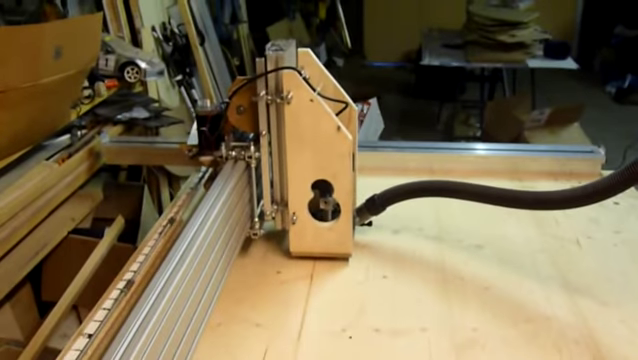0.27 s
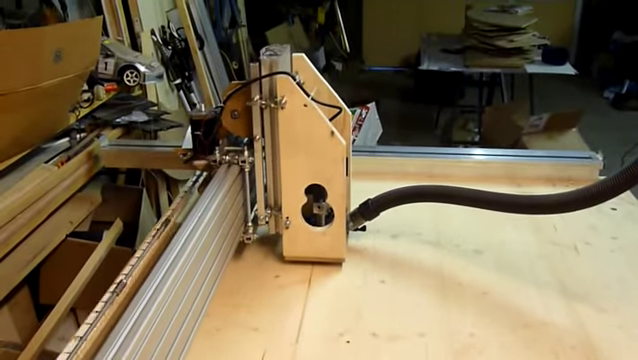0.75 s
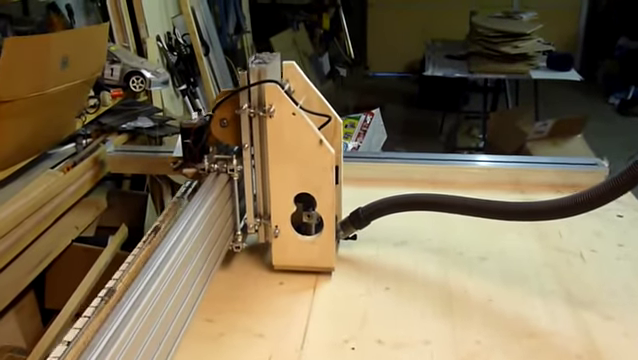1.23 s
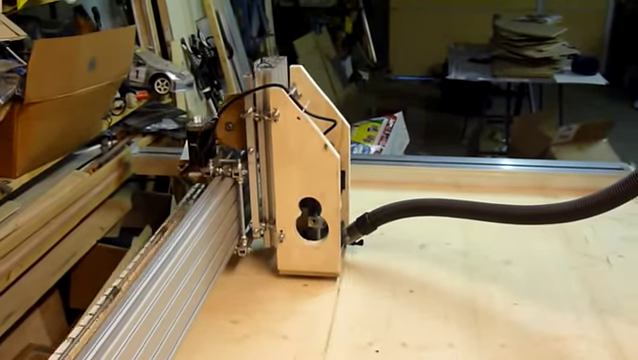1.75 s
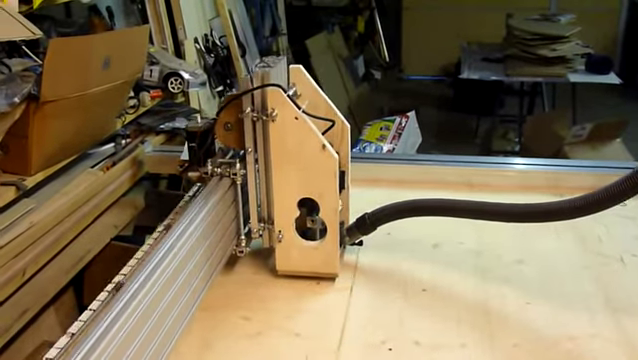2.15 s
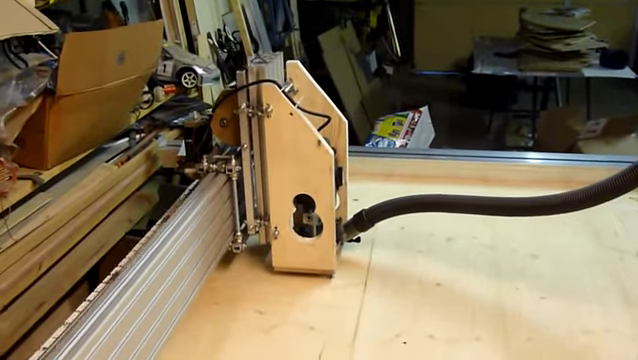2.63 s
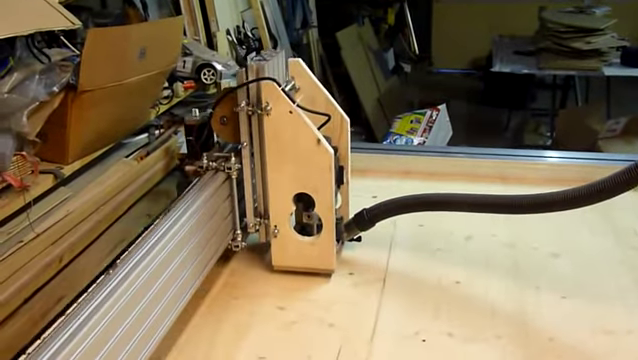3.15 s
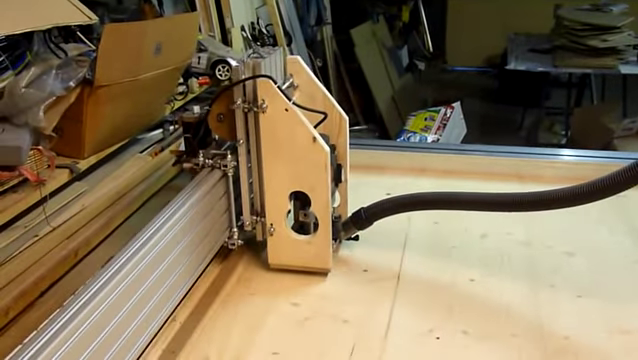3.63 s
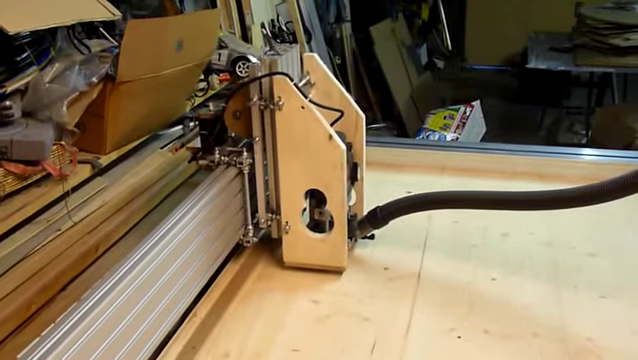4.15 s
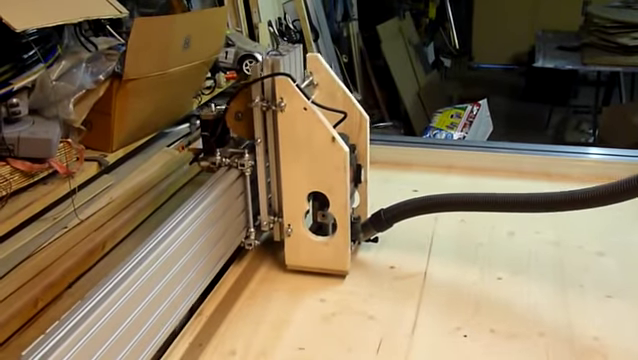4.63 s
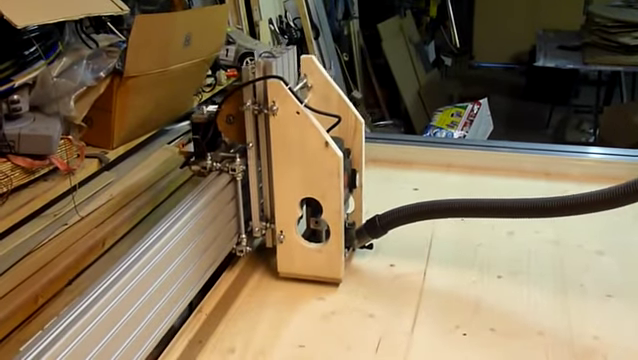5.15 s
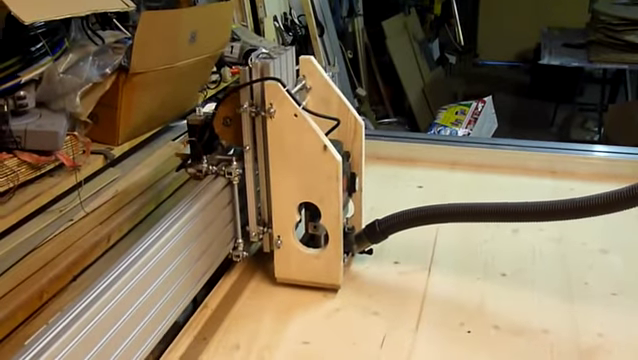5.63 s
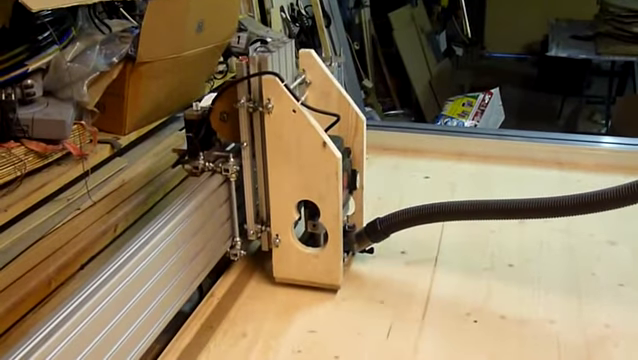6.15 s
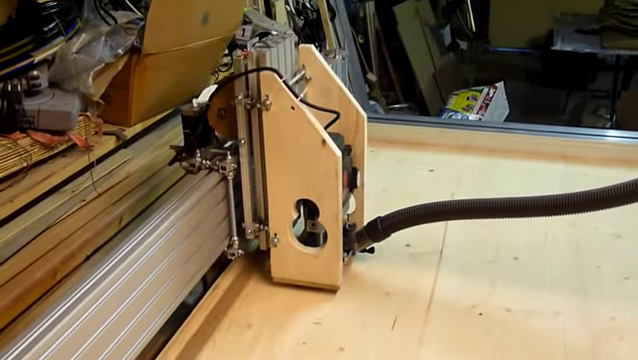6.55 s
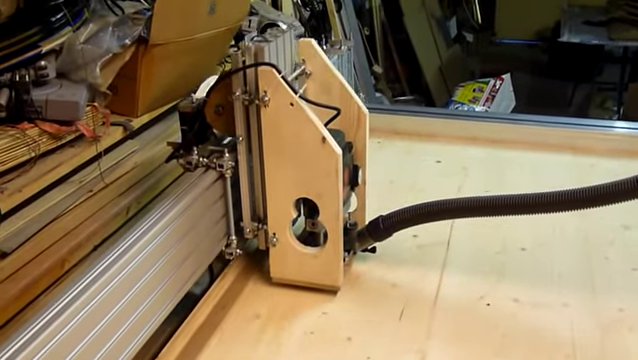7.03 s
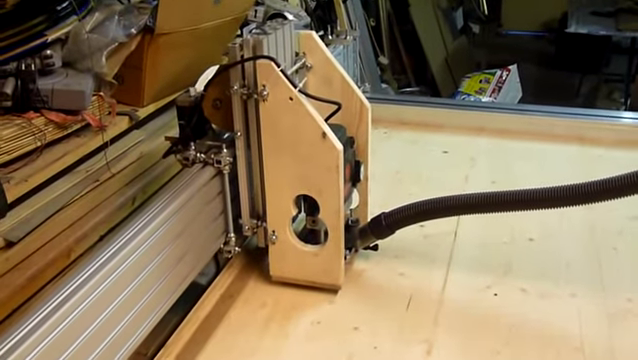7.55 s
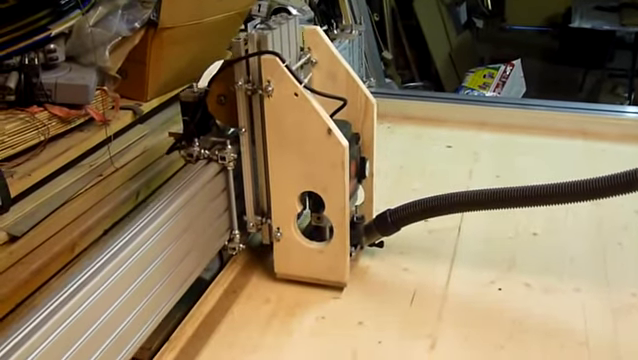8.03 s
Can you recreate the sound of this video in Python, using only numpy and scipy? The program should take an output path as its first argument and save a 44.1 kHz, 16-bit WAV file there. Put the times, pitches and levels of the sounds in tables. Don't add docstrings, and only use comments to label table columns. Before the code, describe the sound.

A router gantry runs empty, its motors whining up, holding a hollow tone, then a brighter buzz, and sliding down amid knocks and clicks.

```python
import sys
import numpy as np
from scipy import signal
from scipy.fft import rfft, irfft, next_fast_len
from scipy.io import wavfile
from scipy.ndimage import uniform_filter1d, map_coordinates

SR = 44100
rng = np.random.default_rng(int(sys.argv[2]) if len(sys.argv) > 2 else 0)


def gain_from_decibels(decibels):
    exponent = np.asarray(decibels, float) / 20
    return 10 ** exponent


def bounce(signal):
    frames = np.transpose(np.atleast_2d(signal))
    limited = np.clip(frames, -1, 1)
    pcm = np.round(limited * 32767).astype(np.int16)
    wavfile.write(sys.argv[1], SR, pcm)


N = 365148

# step_rate_multiple, level_db
LONG_ORDERS = [(.757, -5), (1.76, -12), (2, -4), (3, 3), (4, -10)]
CROSS_ORDERS = [(.5, -16), (1.5, -7), (2, 8), (3, -3.5), (4, -1.5), (5, -5.5), (5.5, -11), (6, -7),
                (8, -10), (9, -6), (10, -7), (11, -10), (14, -10), (15, -9)]
ARRIVE_WHINE = [(16, -8), (20.5, 7), (25, 10), (34, 4)]
LONG_WHINE = [(15.8, -2.5), (34, -13), (66, -19)]
DEPART_WHINE = [(21, -6), (32, -9), (40, -11), (63, -11)]
# step_rate_multiple, level_db
BELT_ORDERS = [(2.94, 0), (5.88, -4.5), (8.82, -8), (11.76, -15), (31.5, -17), (63, -21)]
NEARING_DB = {1.5: 3, 4: 10, 5: 3, 9: 8}

# start_s, full_speed_s, brake_s, stop_s, period_change_ms_per_s
ARRIVE_MOVE = (-1, .048, .048, .56, 27.3)
LONG_MOVE = (.58, .971, 3.672, 4.16, 26.1)
CROSS_MOVE = (4.11, 4.593, 7.403, 7.93, 23.8)
DEPART_MOVE = (7.83, 8.332, 9, 9.5, 23.5)
# time_s, step_rate_hz, step_tone_db, overtones_db
LONG_LOAD = [(0.99, 353.8, -14.5, -51.5), (1.579, 351.7, -14, -54.5), (1.72, 355.3, -15, -47),
             (2.25, 354.3, -15, -54), (2.67, 356.5, -18, -43.5), (2.74, 359, -20, -51),
             (3.459, 353.9, -20.5, -51), (3.66, 356.1, -22, -48.5)]
CROSS_LOAD = [(4.66, 375.7, -31.5, -38.5), (4.74, 378.9, -30, -34.5), (5.37, 375.4, -28, -35.5),
              (5.53, 375.7, -29.5, -39), (5.57, 378, -27.5, -33.5), (5.83, 375.3, -26, -33.5),
              (6.04, 376.4, -28, -38), (6.15, 377.5, -25.5, -33.5), (7.39, 377.1, -26.5, -34.5)]
# overtone_offset_db, whine_or_belt_db, swing_with_overtones (db per db)
LONG_HELD = (5.7, -81.5, .3)
CROSS_HELD = (-7, -40.5, 1.46)
# step_rate_hz, step_tone_db, overtones_db, whine_or_belt_db
ARRIVE_SWEEP = [(63, -73, -45, -57), (76, -65, -55.5, -62), (91, -65, -59, -63), (103, -47, -49, -70),
                (178, -36, -70, -74), (197, -30.5, -44, -71), (290, -38, -50, -72), (350, -26, -46.5, -77)]
LONG_RISE = [(74, -80, -72, -46), (100, -64, -67, -39), (121, -38, -52, -56), (156, -42, -66, -69),
             (201, -30, -63, -72), (270, -37.5, -51, -76), (320, -30.5, -44, -74.5), (342, -31.5, -47, -79),
             (354, -17.5, -48, -77)]
LONG_FALL = [(64.3, -78, -44, -39), (84, -71, -62, -45), (100, -51, -64, -38.5), (124, -47, -59, -53),
             (170, -42, -67, -67.5), (205, -31, -62, -71), (250, -29, -39, -68), (294, -20.5, -54, -76),
             (352.5, -24.5, -37, -81)]
CROSS_RISE = [(65, -78, -71, -41), (78, -67, -81, -43), (101, -65, -62, -39), (135, -51, -55, -40),
              (173, -55, -54, -40.5), (215, -48, -62, -37.5), (240, -30, -58, -41), (268, -24, -65, -31.5),
              (307, -35, -61, -29), (300, -15.5, -64, -40.5), (323, -15.5, -60, -42.5),
              (350, -32, -48, -37), (378, -34, -30, -43)]
CROSS_FALL = [(64.5, -78, -71, -44), (75, -70, -83, -41), (80.5, -63, -79, -43), (99, -61, -77, -45),
              (119, -59, -59, -44.5), (140, -51, -54, -40), (170, -50, -53.5, -42), (215, -48, -78, -37),
              (246, -31, -60, -48), (300, -37, -53, -50), (323, -33, -62, -46.5), (353, -21, -49, -47.5),
              (390, -28, -34, -44)]
RETURN_SWEEP = [(70.6, -75, -56, -51), (88, -68, -52, -41.5), (113, -46, -57, -46), (131, -44, -63, -48),
                (153, -59, -67, -55.5), (180, -44, -66, -47.5), (237, -43.5, -45.5, -60)]

# frequency_hz, level_db
FRAME = [(40, -20), (150, -8), (220, 0), (900, 0), (1050, -7), (1900, -11), (3200, -19), (6000, -22),
         (10000, -34)]
# center_hz, width_hz, lift_db
FRAME_MODES = [(240, 40, 6), (345, 50, 4), (610, 70, 5), (870, 80, 6), (1570, 120, 3)]
# start_s, level_db, pitch_hz, t60_s
JOLTS = [(.0, -24.5, 250, 0.33), (.012, -26.5, 712, .19), (.385, -39.5, 350, 0.43), (.465, -48, 864, .1),
         (.49, -53, 2280, .15), (.498, -30, 205, 0.3), (.505, -41.5, 1056, 0.19), (.62, -40, 847, .12),
         (.93, -35.5, 505, .15), (.945, -40.5, 695, .12), (.97, -20, 300, 0.19), (3.688, -17, 290, 0.2),
         (3.87, -32, 256, .2), (3.93, -33.5, 240, 0.19), (4.04, -54, 1560, 0.36), (4.1, -61, 2260, .15),
         (4.13, -38.5, 860, 0.25), (4.14, -44, 690, 0.18), (4.552, -23, 886, 0.14),
         (4.575, -30, 1100, 0.16), (4.588, -19, 283, 0.14), (4.59, -24.5, 712, 0.092),
         (4.596, -29, 1410, 0.09), (4.618, -29.5, 748, 0.14), (4.624, -21.5, 305, 0.24),
         (4.625, -32, 1096, 0.13), (4.79, -36, 1034, 0.18), (5.538, -40, 1490, .08), (5.55, -43, 1370, .08),
         (5.535, -32, 300, 0.21), (5.534, -27, 487, 0.12), (6.815, -35, 505, 0.14), (7.407, -28, 936, .05),
         (7.412, -34.5, 1310, 0.18), (7.425, -22, 903, 0.13), (7.41, -9.5, 310.6, 0.21),
         (7.45, -33, 1020, 0.13), (7.46, -33, 895, 0.21), (7.476, -36, 278, 0.1), (7.48, -31, 590, .07),
         (7.492, -20.5, 237, 0.15), (7.518, -24.5, 584, 0.083), (7.543, -37, 467, 0.1),
         (7.765, -30, 242.6, 0.6), (7.855, -28, 221, .2), (8.218, -37.5, 451, 0.14),
         (8.219, -48, 1535, 0.11)]
# start_s, level_db, pitch_hz, t60_s
CROSSINGS = [(.27, -40, 192, 0.34), (.66, -38, 187.6, .3), (8.13, -36, 255, .2), (.72, -39, 506, 0.23),
             (3.92, -45, 1550, 0.23), (4.07, -46, 1114, 0.17), (4.26, -39, 852, 0.2), (4.41, -35, 850, .12),
             (7.66, -36.5, 610, 0.64), (7.78, -43, 480, .2), (7.96, -32, 320, 0.28),
             (8.214, -28.5, 178, 0.7), (8.208, -63.5, 8700, .1), (8.236, -64, 8700, .1),
             (8.257, -67, 8750, .08), (8.21, -60, 4100, .08)]

# time_s, level_db
SHAKE = [(0, -42), (.06, -47), (.34, -56), (.8, -55), (.94, -48), (1.04, -49), (2.07, -51), (3.09, -46),
         (3.74, -49), (3.88, -55), (4.49, -56), (4.59, -49), (4.72, -53), (7.36, -51), (7.45, -46),
         (7.53, -56), (8.12, -56), (8.28, -52)]
# level_db, growth (db per db of shake), long_cruise_db, cross_cruise_db
TABLE_BOOM = (-55.5, 1.5, -2.5, -3.5)
WOOD_RATTLE = (-43, 1.49, -4, -7)
RAIL_RATTLE = (-51, 1.48, 0.33, -1.2)
BEARING_HISS = (-59, 1.78, -3, 0.5)
# center_hz, width_hz, lift_db
BOOM_RATE = (165, 43, 9.2)
# frequency_hz, density_db_per_hz
BOOM_SPECTRUM = [(100, -62), (140, -18), (170, -4), (250, -0.5), (320, 6), (420, -18), (600, -52)]
WOOD_SPECTRUM = [(250, -67), (340, 5.5), (440, -2.5), (530, 2), (700, -0.5), (870, 0.5), (1050, -6.5),
                 (1500, -62.5)]
RAIL_SPECTRUM = [(800, -61.5), (1050, 0), (1300, 2.5), (1700, -0.5), (2200, -5), (2600, -6.5), (3400, -57)]
HISS_SPECTRUM = [(2000, -68), (2600, 7), (3400, 2), (4300, -3.5), (5700, -2.5), (7000, -4.5), (8500, -7.5),
                 (10000, -23.5), (10600, -56.5)]

# start_s, peak_db
TICKS = [(0.1778, -42.5), (0.3874, -50), (0.569, -43.5), (0.67, -43), (0.7652, -37.5), (0.867, -39.5),
         (1.02, -48.5), (1.0788, -45.5), (1.2525, -45), (1.269, -39.5), (1.4184, -43), (1.472, -52.5),
         (1.5637, -48.5), (1.6107, -46), (1.648, -47), (1.765, -41.5), (1.8404, -40.5), (1.8515, -41),
         (1.8899, -34), (2.0275, -50), (2.0862, -40), (2.11, -49.5), (2.134, -55.5), (2.1848, -34),
         (2.2643, -40.5), (2.3656, -32), (2.4625, -36.5), (2.563, -44.5), (2.684, -32), (2.752, -40),
         (2.828, -35.5), (2.9766, -43), (3.019, -31), (3.224, -44), (3.2823, -42), (3.334, -29.5),
         (3.5083, -38), (3.684, -43), (3.7896, -49), (4.547, -54.5), (5.419, -47.5), (7.2267, -53),
         (7.3247, -40.5), (8.2574, -51.5)]
# start_s, crack_db, knock_db
KNOCKED_TICKS = [(.2566, -46.5, -38.5), (.7234, -44.5, -44.5), (.9215, -46.5, -63), (.9643, -45, -43.5),
                 (1.1503, -40.5, -27), (1.9894, -50.5, -29), (2.6348, -41.5, -23.5), (3.6292, -53, -42),
                 (4.53, -63, -29.5), (4.556, -49, -28), (4.571, -40.5, -22.5), (4.582, -47, -32),
                 (4.594, -49.5, -24.5), (5.2855, -53, -23), (5.5333, -37, -25), (6.8151, -37.5, -29),
                 (7.008, -59, -39.5), (7.4117, -37, -20.5), (7.45, -56, -47), (8.218, -52, -38)]
# frequency_hz, density_db_per_hz
LINK_SPECTRUM = [(2000, -62.5), (2700, -2), (3600, -2), (4600, 1), (5600, 1), (6800, -1.5), (8500, -13),
                 (10000, -20), (10600, -62)]
KNOCK_SPECTRUM = [(350, -55.5), (500, -6.5), (900, 0), (1300, 0.5), (1900, -9.5), (2500, -11),
                  (3200, -61.5)]
# start_s, level_db, pitch_hz, t60_s
SNAP = (5.2886, -19.5, 1300, .022)

# pitch_hz, width_hz, level_db
PANELS = [
    (880, 40, -60),
    (1560, 24, -65.5),
]
# pitch_hz, width_hz, level_db
TABLE_HUM = (163, 11, -51)
# time_s, level_db
RUMBLE = [(0, -63), (.9, -64.5), (1.1, -60.5), (3.76, -64.5), (4.31, -72.5), (6.55, -69.5), (6.75, -63.5),
          (7.38, -60), (7.55, -69.5), (8.28, -61.5)]
# frequency_hz, density_db_per_hz
DEEP_SPECTRUM = [(20, -64.5), (32, -16.5), (48, 2.5), (65, 4), (90, -4.5), (120, -62.5)]
DRONE_SPECTRUM = [(80, -64), (100, -3.5), (117, -1.5), (135, -8.5), (170, -56.5)]

# frequency_hz, coherence (0 to 1)
ALIKE = [(30, .99), (60, .993), (200, .998), (600, .99), (1100, .93), (1800, .7), (2600, .3), (4500, .3),
         (10000, .1)]
# frequency_hz, left_minus_right_db
PORT_LEAN = [(100, -.1), (350, -.5), (1000, -.3), (1800, .5), (3500, 2), (6000, 2.5), (10000, .5)]
# center_hz, width_hz
NOTCHES = [(2600, 840), (4620, 680), (7900, 400)]


def unit(x):
    return x / np.sqrt(np.mean(x ** 2) + 1e-20)


def along(points, hz):
    f, v = np.transpose(points)
    return np.interp(np.log(hz + 1), np.log(f + 1), v)


def curves(rows):
    s, *columns = np.transpose(rows)
    return [np.interp(np.arange(N) / SR, s, column) for column in columns]


def wobble(rate):
    knots = rng.standard_normal(int(N * 100 / SR) + 4)
    return map_coordinates(knots, [np.arange(N) * min(rate, 100) / SR])


def filtered(x, response):
    m = next_fast_len(N + 8192)
    return irfft(rfft(x, m) * response(np.fft.rfftfreq(m, 1 / SR)), m)[..., :N]


def spread(pair, spectrum):
    def shares(hz):
        turn = np.arccos(np.clip(along(ALIKE, hz), -1, 1)) / 2
        return gain_from_decibels(along(spectrum, hz)) * [np.cos(turn), np.sin(turn)]

    mid, side = filtered(pair, shares)
    return unit(np.array([mid + side, mid - side]))


def lean(db):
    return gain_from_decibels([[db / 2], [-db / 2]])


def drive(move, load, held, rise, fall):
    start, full, brake, stop, pace = move
    start_fade_s, settle_s, release_s = .04, .008, .012
    t = np.arange(N) / SR
    top_hz, tone_db, strain_db = curves(load)
    top_hz = top_hz * (1 + .0018 * wobble(7))
    before_full = (full - t) * (start > 0)
    off_speed_s = np.maximum(0, np.maximum(before_full, t - brake))
    step_hz = 1 / (1 / top_hz + pace / 1000 * off_speed_s)

    lock_times = [full, full + settle_s, brake - release_s, brake]
    locked = (brake > full) * np.interp(t, lock_times, [0, 1, 1, 0])
    fine_db = held[1] + held[2] * (strain_db - strain_db.mean()) + wobble(6)
    steady = [tone_db, strain_db + held[0], fine_db]

    def swept(sweep, k):
        return along([(row[0], row[k + 1]) for row in sweep], step_hz)

    levels = []
    for k in range(3):
        gliding = np.where(t < full + settle_s, swept(rise, k), swept(fall, k))
        levels.append((1 - locked) * gliding + locked * steady[k])
    levels = uniform_filter1d(levels, size=SR // 200, axis=1)
    running = np.interp(t, [start, start + start_fade_s, stop - start_fade_s, stop], [0, 1, 1, 0])
    return step_hz, levels, running


def radiated(hz):
    lifts = sum(db / (1 + (2 * (hz - c) / w) ** 2) for c, w, db in FRAME_MODES)
    return along(FRAME, hz) - 3 + lifts


def motor(driven, orders, fine_orders, flutter_db, tone_db, brake_db, kick=0):
    step_hz, (step_db, over_db, fine_db), running = driven
    braking = np.gradient(step_hz) < -5e-4
    crawl_db = .25 * np.maximum(92 - step_hz, 0) * braking
    slow = np.clip((345 - step_hz) / 80, 0, 1)
    turn = 2 * np.pi * np.cumsum(step_hz * (1 + .005 * slow * wobble(75))) / SR
    tone_level_db = step_db + along(FRAME, step_hz) + (tone_db + 1.3 * slow) * wobble(40)
    out = np.ones((2, 1)) * gain_from_decibels(tone_level_db) * np.sin(turn + kick + .03 * wobble(50))
    travel = np.interp(np.arange(N) / SR, CROSS_MOVE[1:3], [-.3, .3])
    for family, family_db in (orders, over_db), (fine_orders, fine_db):
        for k, db in family:
            depth_db = flutter_db + 1.5 * slow if k < 12 else 2.5
            level_db = family_db + db + radiated(k * step_hz) + depth_db * wobble(38)
            if k > 30:
                level_db = level_db + brake_db * braking - crawl_db
            level = gain_from_decibels(level_db)
            if family is BELT_ORDERS and 5 < k < 12:
                level = level / (1 + (k * step_hz / 1150) ** 6)
            blur = .3 * wobble(22)
            blur = blur + (.6 + .9 * (k > 12) + 1.5 * (k > 30)) * slow * wobble(80)
            blur = blur + .8 * (k > 5) * (1 - slow) * wobble(60)
            drift = wobble(5)
            nearing_db = kick * NEARING_DB.get(k, 0) * travel * (1 - slow)
            level = level * gain_from_decibels(1.8 * (k > 3.5) * drift + nearing_db)
            apart = np.arccos(along(ALIKE, k * step_hz)) * drift / 3
            out = out + level * np.sin(k * turn + kick + blur + np.array([apart, -apart]))
    return np.sqrt(2) * running * out, running * np.sin(turn), running * step_hz


def backlash():
    out, t = np.zeros(N + SR), np.arange(SR // 2) / SR
    swell, bend = wobble(60), wobble(45)
    for k, (s, db, hz, t60) in enumerate(list(JOLTS) + list(CROSSINGS)):
        mine = slice(k * 5000, k * 5000 + len(t))
        build = 1 - np.exp(-t * hz / 2)
        fade = gain_from_decibels(db - 60 * t / t60 + 1.1 * swell[mine]) * build
        out[round(s * SR):][:len(t)] += fade * np.sin(2 * np.pi * hz * t + 1.33 * bend[mine])
    return filtered(out[:N], lambda f: 1 / (1 + (170 / (f + 1)) ** 6))


def patchy(x, db):
    z = signal.stft(x, nperseg=512)[2]
    field = rng.standard_normal(z.shape[1:])
    field = uniform_filter1d(field, size=3, axis=0)
    field = uniform_filter1d(field, size=5, axis=1)
    return unit(signal.istft(z * gain_from_decibels(db * unit(field)), nperseg=512)[1][:, :N])


def carriage(step, long_hz, cross_hz):
    shake_db, = curves(SHAKE)
    shake_db = shake_db - -52
    long_fast, cross_fast = [uniform_filter1d(1. * (hz > 345), SR // 10) for hz in (long_hz, cross_hz)]

    def part_db(part):
        db, grows, long_db, cross_db = part
        return db + grows * shake_db + long_db * long_fast + cross_db * cross_fast

    def shaken(depth):
        return rng.standard_normal((2, N)) * (1 + depth * step)

    center_hz, width_hz, lift_db = BOOM_RATE
    boom_db = part_db(TABLE_BOOM) + lift_db * np.exp(-((long_hz - center_hz) / width_hz) ** 2)
    wood_db, rail_db, hiss_db = part_db(WOOD_RATTLE), part_db(RAIL_RATTLE), part_db(BEARING_HISS)
    lumps = wobble(24)
    boom = gain_from_decibels(boom_db + 6.5 + 1.3 * wobble(30)) * spread(shaken(.1), BOOM_SPECTRUM)
    wood = gain_from_decibels(wood_db - .5 + 2.1 * lumps + 1.4 * wobble(60)) * spread(shaken(.15), WOOD_SPECTRUM)
    rail = gain_from_decibels(rail_db - 2.5 + 2 * lumps + 1.3 * wobble(70)) * spread(shaken(.23), RAIL_SPECTRUM)
    hiss = patchy(spread(shaken(.2), HISS_SPECTRUM), db=2.5)
    hiss = gain_from_decibels(hiss_db + 1.1 * lumps + 1.2 * wobble(70)) * hiss
    return boom + wood + rail + hiss


def chain():
    crack, knock, pings = np.zeros(N + SR), np.zeros(N + SR), np.zeros(N + SR)
    t = np.arange(SR // 4) / SR
    decay = gain_from_decibels(-60 * t / .03) + gain_from_decibels(-9.5 - 60 * t / .23)
    fade = decay * (1 - np.exp(-t / .0012))
    ping = gain_from_decibels(-60 * t / .012) * (1 - np.exp(-t / .0004)) * np.sin(2 * np.pi * 5900 * t)
    ping = ping + gain_from_decibels(-8) * np.roll(ping, round(.0045 * SR))
    links = [(s, db, -32.5 + .36 * (db + 32.5)) for s, db in TICKS]
    for s, crack_db, knock_db in links + list(KNOCKED_TICKS):
        here = slice(round(s * SR), round(s * SR) + len(t))
        crack[here] += gain_from_decibels(crack_db - 6) * fade
        pings[here] += gain_from_decibels(crack_db + 4) * ping
        knock[here] += gain_from_decibels(knock_db - 9) * fade
    bright = spread(rng.standard_normal((2, N)), LINK_SPECTRUM) * lean(1.6)
    dull = spread(rng.standard_normal((2, N)), KNOCK_SPECTRUM)
    return pings[:N] * np.array([[1], [.1]]) + crack[:N] * bright + knock[:N] * dull


def hose():
    s, db, hz, t60 = SNAP
    t = np.maximum(np.arange(N) / SR - s, 0)
    crack = gain_from_decibels(-14 - 60 * t / .014) * spread(rng.standard_normal((2, N)), HISS_SPECTRUM) * lean(-5)
    note = gain_from_decibels(-60 * t / t60) * (1 - np.exp(-t / .001)) * np.sin(2 * np.pi * hz * t)
    return (t > 0) * gain_from_decibels(db) * (note + crack)


def ring(hz, width_hz, db):
    def mode(f):
        return 1 / (1 + ((f - hz) / (width_hz / 2)) ** 2)

    return gain_from_decibels(db) * spread(filtered(rng.standard_normal((2, N)), mode), [(hz, 0)])


def panels():
    fast = np.interp(np.arange(N) / SR, [.95, 1.05, 3.6, 3.75], [0, 1, 1, 0])
    return sum(ring(*panel) for panel in PANELS) + fast * ring(*TABLE_HUM)


def workshop():
    deep_db, = curves(RUMBLE)
    drone_db = -65.5 + .63 * (deep_db - deep_db.mean()) + 1.6 * wobble(3.7)
    deep_db = deep_db + wobble(3.1)
    deep = gain_from_decibels(deep_db) * spread(rng.standard_normal((2, N)), DEEP_SPECTRUM)
    return deep + gain_from_decibels(drone_db) * spread(rng.standard_normal((2, N)), DRONE_SPECTRUM)


def scene():
    def long_drive(move, rise, fall):
        return drive(move, LONG_LOAD, LONG_HELD, rise, fall)

    arrive = motor(long_drive(ARRIVE_MOVE, ARRIVE_SWEEP, ARRIVE_SWEEP), LONG_ORDERS, ARRIVE_WHINE,
                   flutter_db=3, tone_db=1, brake_db=0)
    long_axis = motor(long_drive(LONG_MOVE, LONG_RISE, LONG_FALL), LONG_ORDERS, LONG_WHINE,
                      flutter_db=2.5, tone_db=.3, brake_db=8)
    depart = motor(long_drive(DEPART_MOVE, RETURN_SWEEP, RETURN_SWEEP), LONG_ORDERS, DEPART_WHINE,
                   flutter_db=2.5, tone_db=.4, brake_db=0)
    cross = motor(drive(CROSS_MOVE, CROSS_LOAD, CROSS_HELD, CROSS_RISE, CROSS_FALL), CROSS_ORDERS,
                  BELT_ORDERS, flutter_db=1.6, tone_db=0, brake_db=9, kick=np.pi / 2)
    tones, steps, rates = zip(arrive, long_axis, depart, cross)
    motors = lean(-.25) * sum(tones[:3]) + lean(.05) * tones[3]
    motors = filtered(motors, lambda f: 1 / (1 + (95 / (f + 1)) ** 6))
    rolling = carriage(sum(steps), np.max(rates[:3], axis=0), rates[3])
    return motors + backlash() + rolling + chain() + hose() + panels() + workshop()


def top_cut(x):
    return signal.sosfilt(signal.butter(12, 10630, fs=SR, output="sos"), x)


def record(dry):
    def dips(f):
        cuts = [1 - .93 * 1j * f * w / (c * c - f * f + 1j * f * w) for c, w in NOTCHES]
        return np.prod(cuts, axis=0)

    def ports(f):
        return gain_from_decibels(np.outer([.5, -.5], along(PORT_LEAN, f)))

    mix = filtered(dry, lambda f: dips(f) * ports(f) * (f < 10300))
    return top_cut(mix)


dry = scene()
out = record(dry)
bounce(out)
```